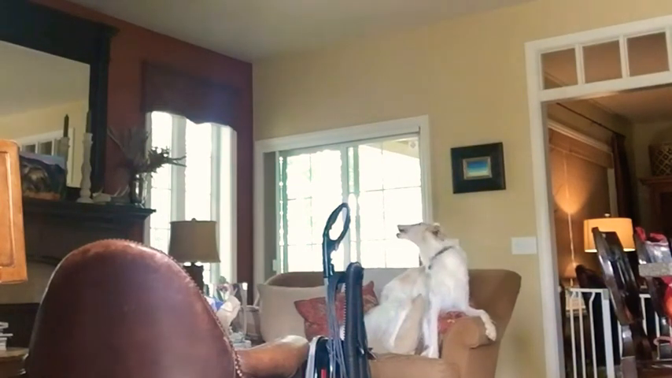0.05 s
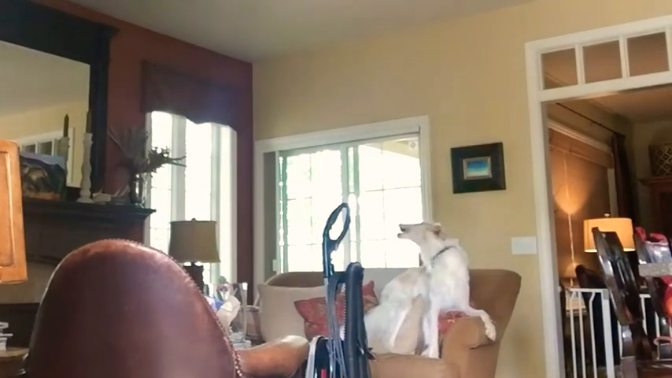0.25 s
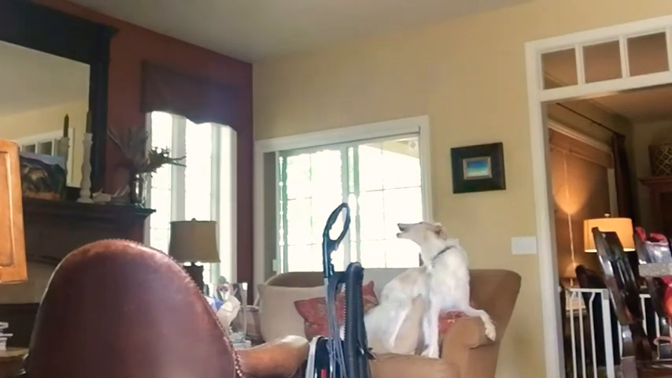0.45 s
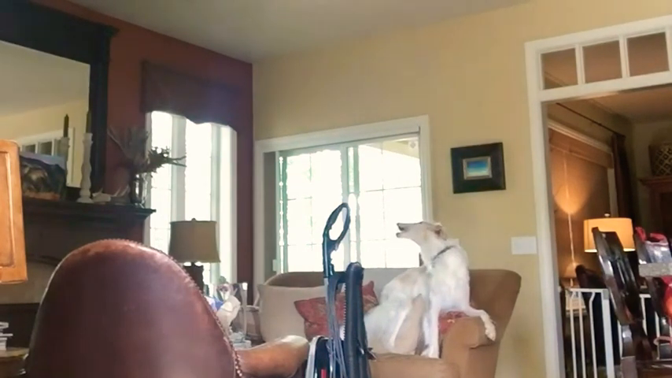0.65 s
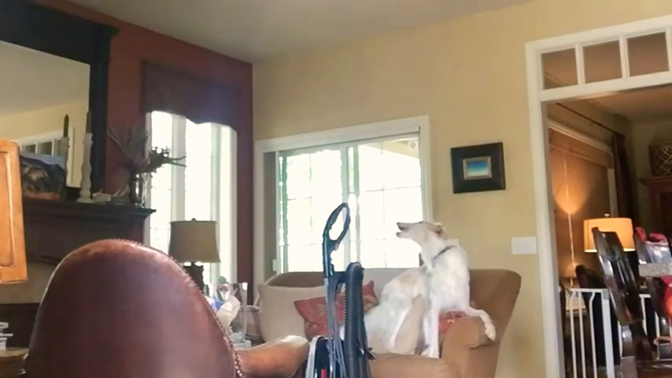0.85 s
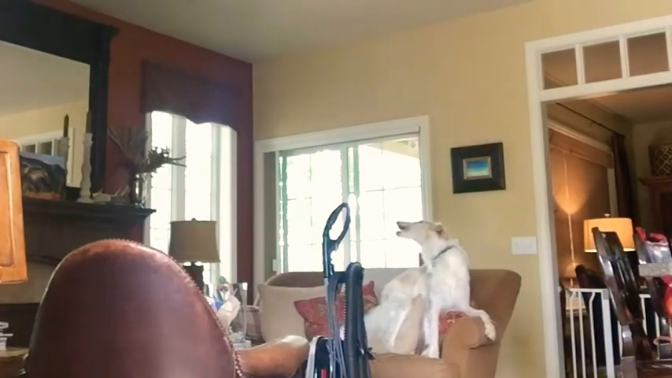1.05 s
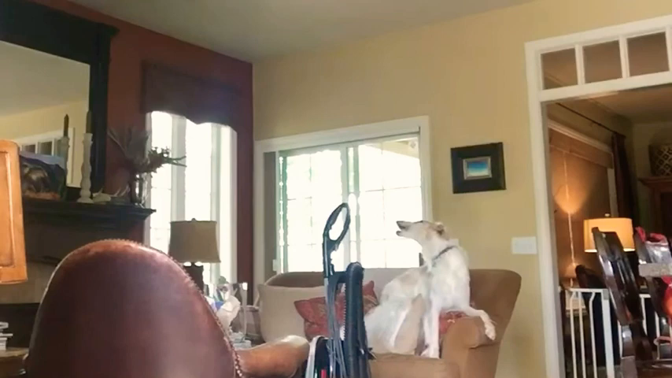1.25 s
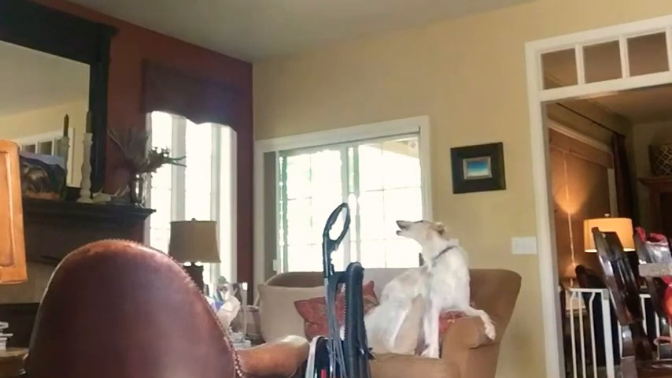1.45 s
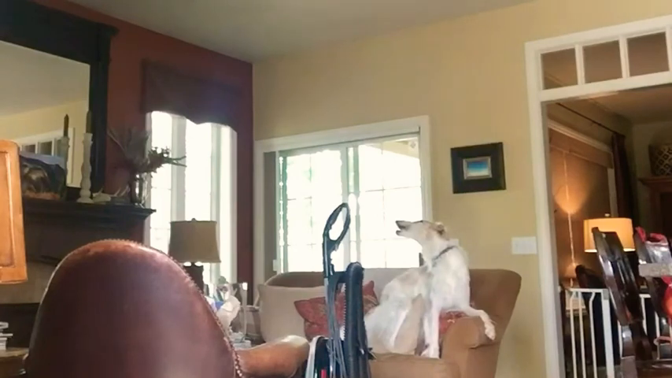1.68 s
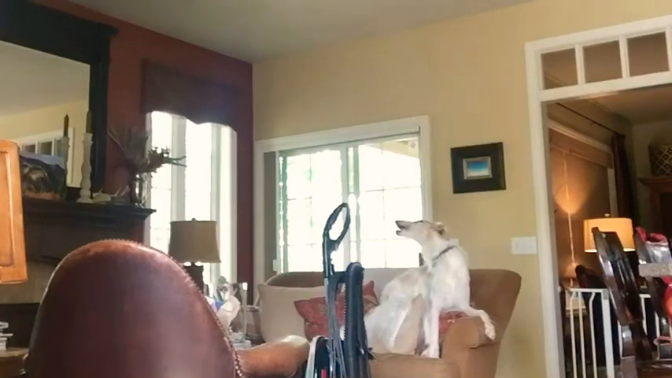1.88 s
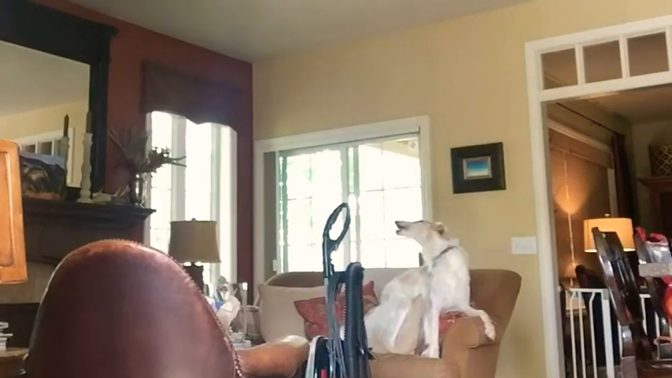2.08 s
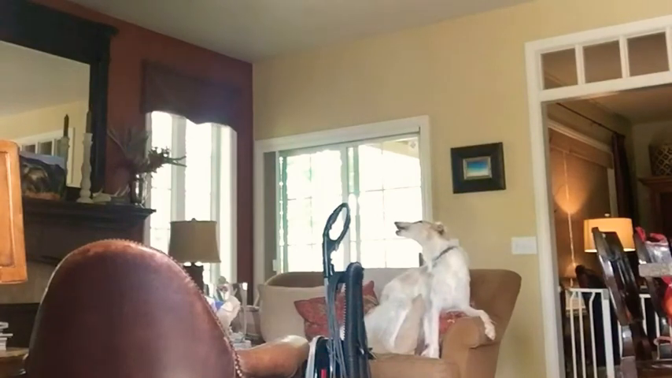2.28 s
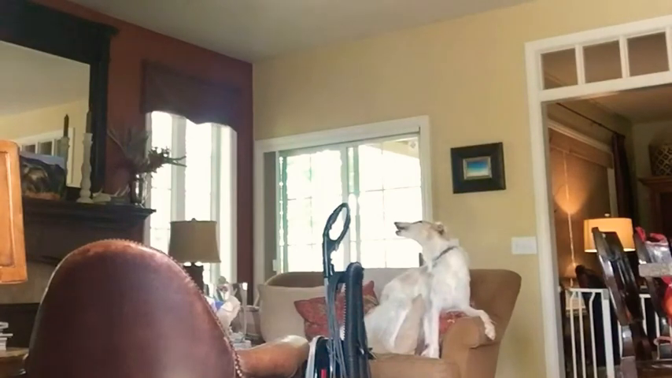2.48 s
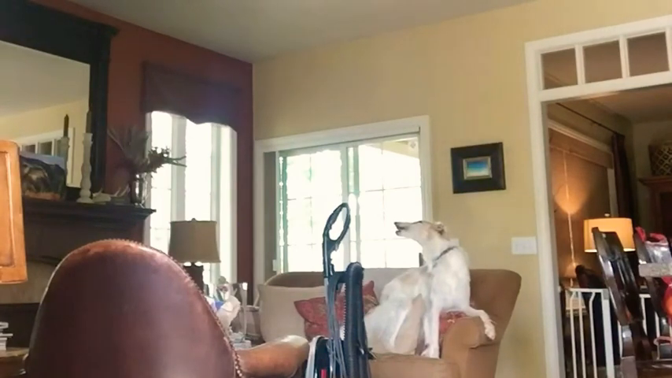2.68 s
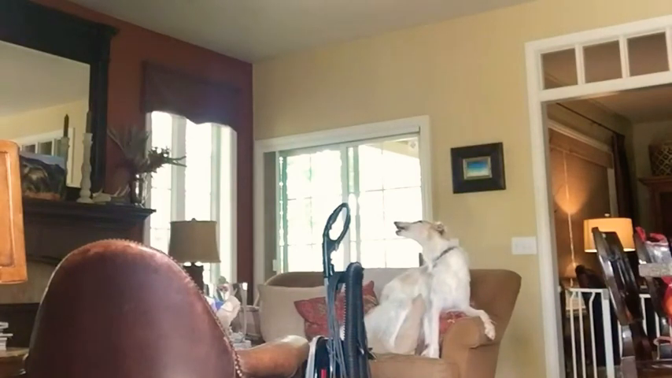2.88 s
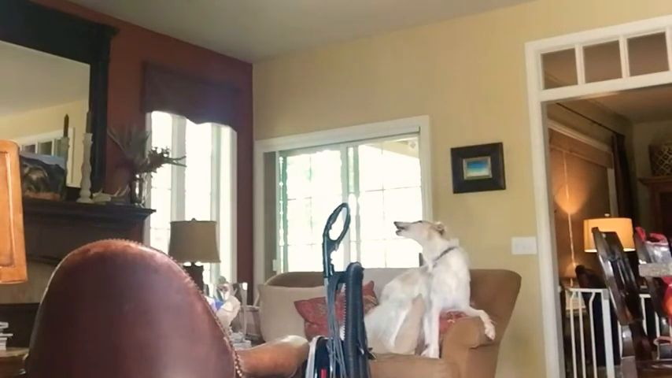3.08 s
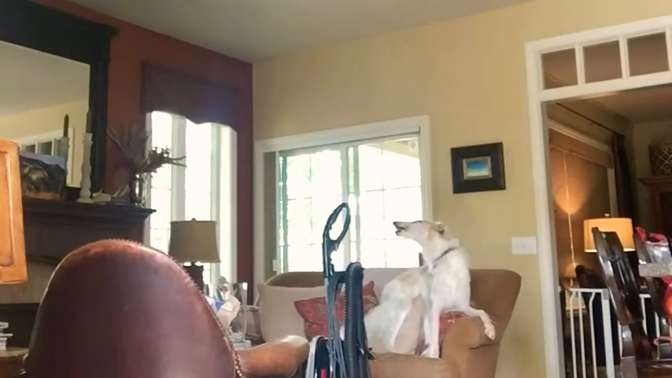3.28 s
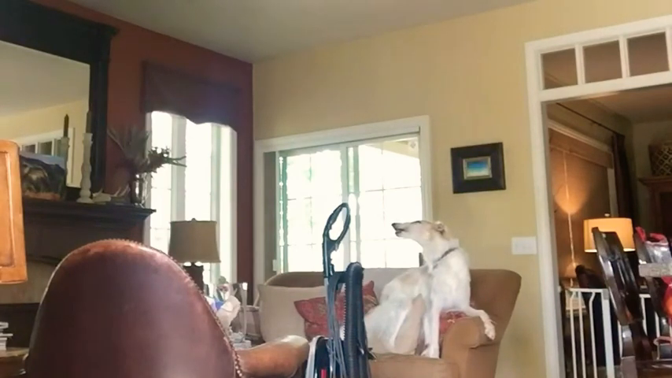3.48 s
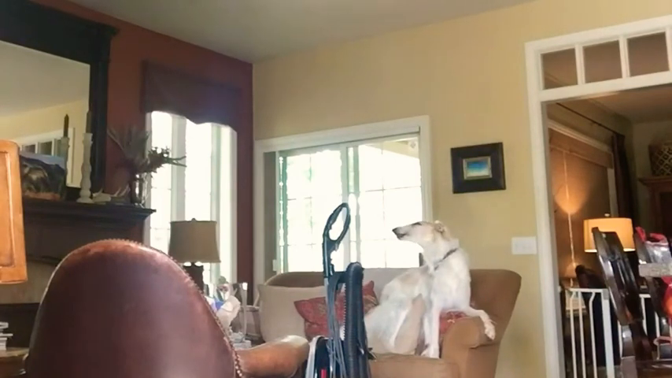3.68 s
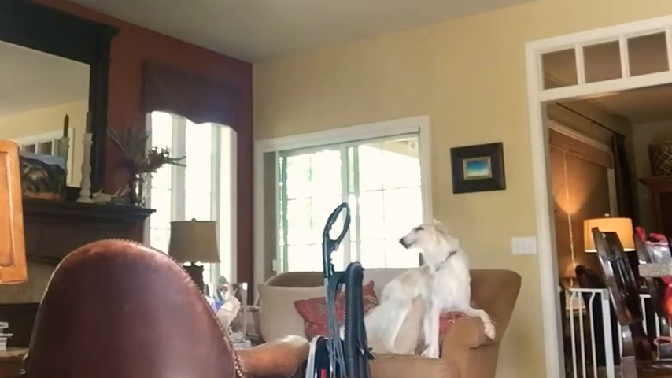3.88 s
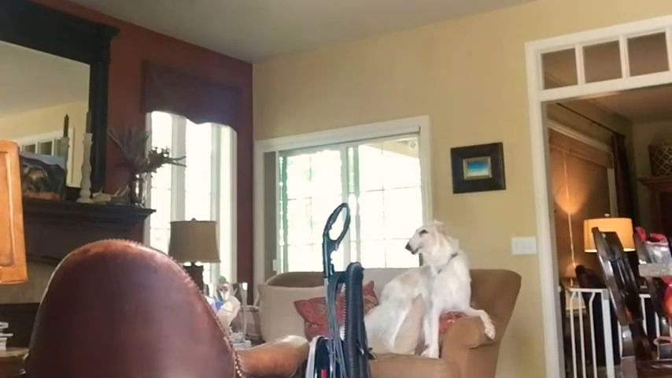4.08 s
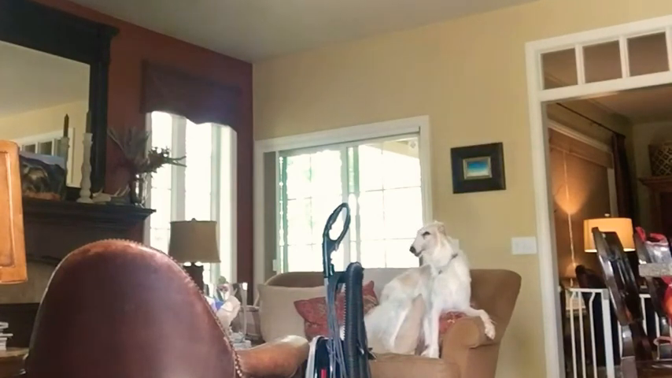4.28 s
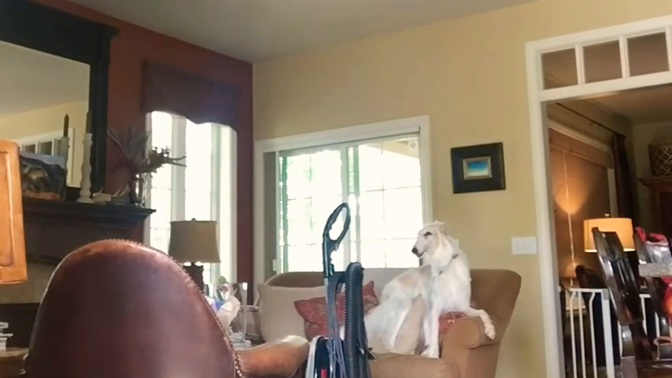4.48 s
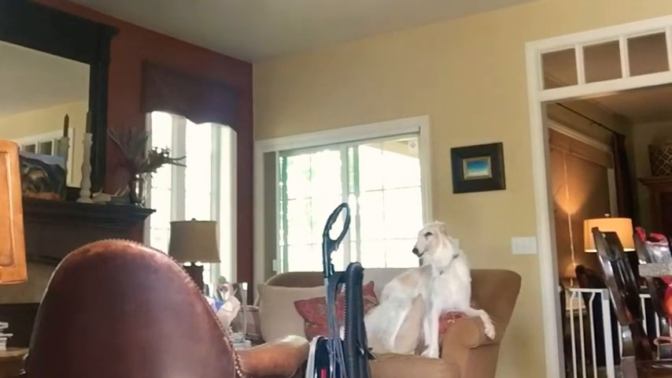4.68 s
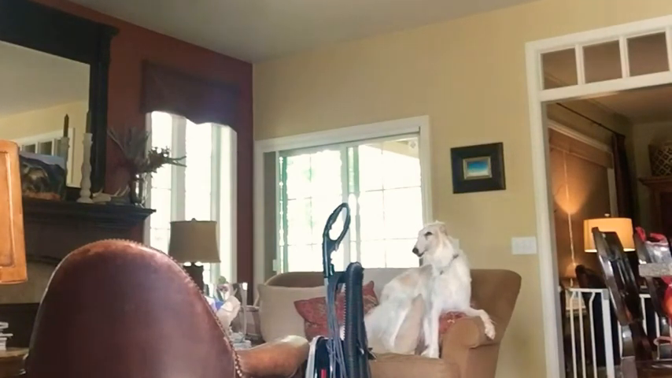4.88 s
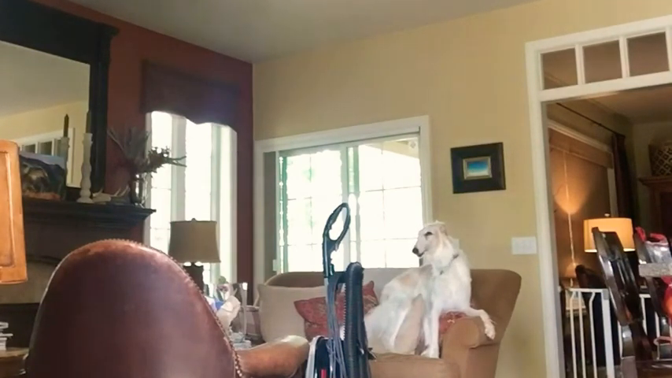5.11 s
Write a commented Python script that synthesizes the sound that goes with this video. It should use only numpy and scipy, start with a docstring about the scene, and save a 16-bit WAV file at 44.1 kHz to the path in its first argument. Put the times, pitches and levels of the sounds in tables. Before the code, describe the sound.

One long dog howl begins right away, swelling and dipping in loudness as its pitch gradually falls. It turns rough for a moment and carries a faint, high, airy whistle. Near the end it drops to a groan and closes with a quick grunt. The microphone picks it up from across a living room, with short reflections off the walls and a quiet, low household hum underneath.

```python
"""One long dog howl, already under way as the sound begins, slides down in pitch, ending in a groan and a short
grunt. The vocal folds sound three harmonics shaped by the mouth; for a while the folds flutter. A thin whistle
sounds along with them and beats with them, and air hisses through the throat. The living room around the dog
rings briefly, and a low household rumble lies under it all."""
import sys
import numpy as np
from scipy import signal
from scipy.fft import rfft, irfft
from scipy.io import wavfile
from scipy.ndimage import uniform_filter1d

SR = 44100
rng = np.random.default_rng(int(sys.argv[2]) if len(sys.argv) > 2 else 0)


def materialize(psi):
    """Save the field psi as 16-bit PCM at rate SR to the path in sys.argv[1].

    A 1-D psi becomes a single channel; in a 2-D psi each row is a channel.
    """
    bounded = np.clip(np.atleast_2d(psi).T, -1, 1)
    quanta = np.round(bounded * 32767).astype(np.int16)
    wavfile.write(sys.argv[1], SR, quanta)


N = 227065
TIME = np.arange(N) / SR
BIN_HZ = np.fft.rfftfreq(N, 1 / SR)


def amp(db):
    """Decibels to gain."""
    return 10 ** (np.asarray(db) / 20)


def unit(x):
    """Scales to rms 1."""
    return x / np.sqrt(np.mean(x ** 2) + 1e-20)


def curves(rows):
    """Each column of a table, interpolated over time."""
    seconds, *columns = np.transpose(rows)
    return [np.interp(TIME, seconds, column) for column in columns]


def spectrum(rows, hz):
    """A two-column table, interpolated over log frequency."""
    row_hz, values = np.transpose(rows)
    return np.interp(np.log(hz + 1), np.log(row_hz), values)


def smooth_gain(db):
    """A level curve as a gain with rounded corners."""
    return uniform_filter1d(uniform_filter1d(amp(db), size=600), size=600)


def gate(end_s, fade_s):
    """One until end_s, then a linear fade."""
    return np.clip((end_s - TIME) / fade_s + 1, 0, 1)


def wander(rate_hz):
    """Random drift of rms 1, rolled off at rate_hz."""
    return unit(irfft(rfft(rng.standard_normal(N)) / (1 + (BIN_HZ / rate_hz) ** 2) ** 2, N))


def phase(hz):
    """Running phase of a frequency curve."""
    return 2 * np.pi * np.cumsum(hz) / SR


def tone(angle):
    """Sine of rms 1, random start phase."""
    return np.sqrt(2) * np.cos(angle + 2 * np.pi * rng.random())


# Each row: frequency in Hz, relative rumble level in dB.
RUMBLE_SPECTRUM = [(15, -48), (25, -13), (116, -8), (148, -12), (183, -3), (215, -21), (289, -18),
                   (368, -29), (1300, -35.5), (2490, -35.5), (2850, -39), (3530, -39.5), (7100, -42),
                   (9300, -40), (15500, -45.5)]
# Each row: frequency in Hz, level in dB.
HUM_TONES = [(119, -75), (183, -81.5), (9001, -97.5)]


def household(rumble_db=-67):
    """Steady rumble and the wavering hum of appliances."""
    colour = amp(spectrum(RUMBLE_SPECTRUM, BIN_HZ))
    rumble = unit(irfft(rfft(rng.standard_normal(N)) * colour, N))
    hum = sum(amp(db) * tone(phase(hz + 4 * wander(8))) * (1 + 0.34 * wander(9)) for hz, db in HUM_TONES)
    return amp(rumble_db) * rumble + hum


# Each row: frequency in Hz, reverb level in dB.
REVERB_LEVELS = [(300, -11), (700, -12), (1400, -7), (3000, -3), (7000, -1), (15000, -1)]
# Each row: frequency in Hz, T60 in seconds.
REVERB_TIMES = [(300, .44), (700, .38), (3000, .4), (7000, .33), (15000, .2)]


def room(x, taps_per_s=3000, gap_s=0.004):
    """Dense reflections of random sign, each band dying at its own speed."""
    taps = rng.choice([-1., 1.], SR) * (rng.random(SR) < taps_per_s / SR) * (np.arange(SR) > gap_s * SR)
    hz, t, bands = signal.stft(unit(taps), SR, nperseg=256)
    t60_s = spectrum(REVERB_TIMES, hz)[:, None]
    wet = amp(spectrum(REVERB_LEVELS, hz))[:, None]
    decay = np.exp(-np.log(1000) * t / t60_s) * np.sqrt(2 * np.log(1000) / (t60_s * SR))  # unit energy
    response = signal.istft(bands * decay * wet, SR, nperseg=256)[1]
    return signal.fftconvolve(x, response)[:N]


# Each row: delay in ms, reflection gain in dB.
EARLY_REFLECTIONS = [(5.3, -12.1), (10.0, -6.4), (10.6, -4.9), (16.8, -4.3), (17.5, -3.9), (40.3, -9.0),
                     (40.9, -7.8), (42.2, -17.1), (57.4, -11.7), (57.7, -10.6)]


def walls(x):
    """Echoes off walls, floor and ceiling reinforce and cancel the sliding howl by turns."""
    return sum(amp(db) * np.pad(x, (round(ms * SR / 1000), 0))[:N] for ms, db in EARLY_REFLECTIONS)


def tension(pitch_hz, mid_hz=585):
    """Tightness of the folds, in octaves above mid pitch."""
    return np.log2(pitch_hz / mid_hz)


def jaw_closed(start_s=3.66, length_s=0.06):
    """The jaw shuts near the end: 0 open, 1 closed."""
    return np.clip((TIME - start_s) / length_s, 0, 1)


def airflow_db(pitch_hz, mid_db=-56.5, db_per_octave=15.5, closed_db=-4.5):
    """More air passes tight folds and an open mouth."""
    return mid_db + db_per_octave * tension(pitch_hz) + closed_db * jaw_closed()


# Each row: resonance centre in Hz, width in Hz, peak in dB.
TRACT_RESONANCES = [(1276, 220, 4), (1890, 81, -5.5), (2817, 130, 6), (3370, 130, -14.5), (3868, 87, -6),
                    (4744, 190, -1), (5244, 176, 2.5), (5771, 28, 12), (7140, 87, 14), (6810, 260, 9),
                    (8550, 190, -3.5), (10060, 206, -12), (11340, 2182, -12.5), (13440, 130, -6),
                    (14750, 180, -9.5)]


def vocal_tract(hz, valley_db=-26, low_cut_hz=900):
    """Gain of throat, mouth and nose: steep peaks over a shallow valley."""
    peak_power = sum(amp(db) ** 2 / (1 + ((hz - centre_hz) / width_hz) ** 2) ** 2
                     for centre_hz, width_hz, db in TRACT_RESONANCES)
    valley = amp(valley_db) * hz ** 2 / (hz ** 2 + low_cut_hz ** 2)
    return np.sqrt(peak_power + valley ** 2)


# Each row: frequency in Hz, relative air level in dB ahead of the tract.
AIR_SPECTRUM = [(200, -13.5), (500, 27), (1300, 4.5), (2800, -4), (5200, -3), (7000, -10.5), (10000, -2),
                (15500, 7)]


def air(pitch_hz, cycle, trim_db=-1, pulsing=0.34, split_hz=3500, low_db=-3, low_db_per_octave=-8):
    """Turbulence puffed by the folds, coloured by the throat; slack folds favour its low part."""
    puffs = rng.standard_normal(N) * (1 + pulsing * np.cos(cycle))
    hiss = unit(irfft(rfft(puffs) * vocal_tract(BIN_HZ) * amp(spectrum(AIR_SPECTRUM, BIN_HZ)), N))
    low = irfft(rfft(hiss) / (1 + (BIN_HZ / split_hz) ** 4), N)
    hiss = hiss - low + low * amp(low_db + low_db_per_octave * tension(pitch_hz))
    return hiss * smooth_gain(airflow_db(pitch_hz) + trim_db) * gate(3.85, 0.13)


# Each row: time in seconds, flutter rate in Hz, depth from 0 to 1.
FOLD_FLUTTER = [(.95, 141.8, 0), (1.02, 144.7, 0.29), (1.2, 130.3, 0.35), (1.45, 139.2, 0.56),
                (1.7, 116.4, 0.12), (1.87, 100.4, 0)]


def flutter():
    """Rate in Hz and depth of the folds' passing flutter."""
    return curves(FOLD_FLUTTER)


# Each row: time in seconds, whistle pitch in Hz.
WHISTLE_PITCH = [(0, 3223), (.3, 3212), (.6, 3234), (1.0, 3221), (1.8, 3253), (2.3, 3233), (3.5, 3232),
                 (3.8, 3336)]


def whistle_phase(detune=0):
    """Phase of the whistle, a second, high oscillator."""
    return phase(curves(WHISTLE_PITCH)[0] * (1 + detune))


def whistle_hiss(pitch_hz, cycle, trim_db=-7, smear_rad=1.5, flicker_db=3):
    """Whistle harmonics 3 and 4 beat with the folds, frayed into narrow bands of hiss."""
    whistle_cycle = whistle_phase()
    bands = sum(tone(m * whistle_cycle + k * cycle + smear_rad * wander(130))
                * amp(flicker_db * wander(1.4)) for m in (3, 4) for k in range(-3, 4))
    bands = irfft(rfft(bands) * vocal_tract(BIN_HZ), N)
    return unit(bands) * smooth_gain(airflow_db(pitch_hz) + trim_db) * gate(3.68, 0.065)


# Four groups: near the whistle's pitch, below its octave, at it, above it.
# Each row: whistle multiple (0 for a plain fold harmonic), fold multiple, relative level in dB.
PARTIAL_GROUPS = [
    [(0, 4, 5), (0, 5, -2.5), (0, 6, -9.5), (1, -4, 1), (1, -2, 4.5), (1, -1, 3), (1, 0, 5.5), (1, 1, -4.5)],
    [(0, 7, -22.5), (0, 8, -15.5), (1, 2, -4), (1, 3, -7), (1, 4, -3.5), (2, -3, -8.5), (2, -2, -5.5),
     (2, -1, -3.5)],
    [(2, 0, 0)],
    [(2, 1, -5.5), (2, 2, -3.5), (2, 3, -9)],
]
# One row per group. Each row: base level in dB, swell level in dB, howl pitch of the swell in Hz,
# swell width in octaves, change at full flutter in dB, stop in seconds.
GROUP_LEVELS = [(-71, -53, 580.5, 0.48, -19.5, 3.6), (-64.5, -49, 658.6, 0.077, 8, 3.3),
                (-54.5, -65.5, 1100, 0.092, 0.5, 1.923), (-74.5, -44.5, 770, 0.13, 9, 3.6)]


def whistle(pitch_hz, cycle, waver_db=2):
    """The folds chop the whistle's air; sum and difference tones slide through the tract's peaks."""
    whistle_hz = curves(WHISTLE_PITCH)[0]
    whistle_cycle = whistle_phase(detune=0.0019 * wander(60))
    _, depth = flutter()
    smear_rad = (0.043 + 0.46 * depth) * wander(130)  # flutter smears the beats
    grid_hz = np.arange(0, SR / 2, 10)
    tract = vocal_tract(grid_hz)
    out = np.zeros(N)
    for group, levels in zip(PARTIAL_GROUPS, GROUP_LEVELS):
        base_db, swell_db, swell_hz, width_octaves, flutter_db, stop_s = levels
        partials, power = 0, 1e-12
        for m, k, db in group:
            gain = amp(db) * np.interp(m * whistle_hz + k * pitch_hz, grid_hz, tract)
            if k == 0:  # slack folds chop deeper, leaving less plain whistle
                gain *= (pitch_hz / pitch_hz.mean()) ** 3
            partials += gain * tone(m * whistle_cycle + k * (cycle + smear_rad))
            power += gain ** 2
        swell = np.exp(-(np.log2(pitch_hz / swell_hz) / width_octaves) ** 2)
        strength = amp(base_db) + amp(swell_db) * swell
        strength *= amp(flutter_db * depth + waver_db * wander(14))
        out += strength * gate(stop_s, 0.061) * partials / np.sqrt(power)
    return out


def grunt(start_s=3.88, length_s=0.11, from_hz=320, to_hz=180, level_db=-59):
    """The folds go slack at the end: a short, rough, falling grunt."""
    progress = np.clip((TIME - start_s) / length_s, 0, 1)
    cycle = phase((from_hz + progress * (to_hz - from_hz)) * (1 + 0.13 * wander(150)))
    return amp(level_db) * np.sin(np.pi * progress) * (tone(cycle) + 0.14 * tone(2 * cycle))


def groan(cycle, start_s=3.3, length_s=0.31, level_db=-62):
    """Low in the howl the voice turns buzzy: harmonics 3 to 7 come up."""
    progress = np.clip((TIME - start_s) / length_s, 0, 1)
    buzz = unit(sum(tone(k * cycle) / k for k in range(3, 8)))
    return amp(level_db) * np.sin(np.pi * progress) * buzz


# Each row: time in seconds, pitch of the folds in Hz.
HOWL_PITCH = [(0.0, 808.6), (0.099, 737), (0.174, 698), (0.317, 675.1), (0.659, 664.7), (0.848, 652.5),
              (1.013, 618.7), (1.254, 608), (1.628, 571.5), (1.878, 535.6), (2.047, 483.3), (2.307, 471.7),
              (2.435, 482.7), (2.851, 482.6), (3.223, 519.8), (3.611, 462.4), (3.724, 387.4), (3.88, 370)]


def fold_motion(mid_jitter=0.0037, jitter_db_per_octave=-14.5):
    """Pitch and phase of the folds, least steady when slack or gliding fast."""
    pitch_hz = curves(HOWL_PITCH)[0]
    glide_octaves_per_s = np.minimum(abs(np.gradient(tension(pitch_hz))) * SR, 1)
    jitter = mid_jitter * amp(jitter_db_per_octave * tension(pitch_hz)) * (1 + 0.5 * glide_octaves_per_s)
    return pitch_hz, phase(pitch_hz * (1 + jitter * wander(86.3)))


# Each row: time in seconds, level of the dry fundamental in dB.
HOWL_LEVELS = [(0.0, -31.5), (0.06, -20.5), (0.18, -34.0), (0.35, -25), (0.85, -35.5), (1.05, -23),
               (1.45, -37), (1.8, -37), (1.96, -31), (2.6, -36), (3.1, -34), (3.25, -32.0), (3.5, -39),
               (3.87, -39)]
# Each row: frequency in Hz, mouth gain on the overtones in dB.
MOUTH_RESPONSE = [(750.0, -5.0), (900.0, -25.5), (1050.0, -16.5), (1200.0, -3.5), (1350.0, -11),
                  (1480.0, -29), (1700.0, -24.5), (1950.0, -42), (2300.0, -58)]


def folds(pitch_hz, cycle, attack_s=0.004, waver_db=3, rasp_db=-35, rasp_db_per_octave=-9):
    """The howl: three harmonics, the upper two shaped by the mouth; flutter adds sidebands."""
    rate_hz, depth = flutter()
    depth *= 1 + 0.48 * wander(20)
    swing = phase(rate_hz * (1 + 0.0082 * wander(61)))
    sidebands = depth / 2 * (1.7 * np.cos(cycle + swing) + 0.76 * np.cos(cycle - swing))
    fundamental = np.sqrt(2) * (np.cos(cycle) + sidebands)
    overtones = 0
    for k, trim_db in [(2, 0.7), (3, 1 - 30 * jaw_closed())]:  # the jaw muffles the third
        mouth_db = spectrum(MOUTH_RESPONSE, k * pitch_hz)
        overtones += amp(mouth_db + trim_db + waver_db * wander(30)) * tone(k * cycle)
    voice = fundamental + overtones * (1 + 0.305 * depth * np.cos(swing))
    rasp = amp(rasp_db + rasp_db_per_octave * tension(pitch_hz)) * wander(200)
    attack = np.sin(np.pi / 2 * np.minimum(TIME / attack_s, 1)) ** 2
    envelope = smooth_gain(curves(HOWL_LEVELS)[0]) * attack * gate(3.869, 0.025)
    return envelope * voice * (1 + rasp)


def scene():
    """The dog in its room, mono."""
    pitch_hz, cycle = fold_motion()
    howl = folds(pitch_hz, cycle)
    whistling = whistle(pitch_hz, cycle) + whistle_hiss(pitch_hz, cycle)
    dog = howl + whistling + air(pitch_hz, cycle) + groan(cycle) + grunt()
    near = dog + walls(howl)
    return (near + room(near) + household())[None]


def record(dry, cutoff_hz=15720):
    """Steep low-pass on the top treble."""
    lowpass = signal.firwin(801, cutoff_hz, window=("kaiser", 9), fs=SR)
    return signal.oaconvolve(dry, lowpass[None], "same")


dry = scene()
out = record(dry)
materialize(out)
```